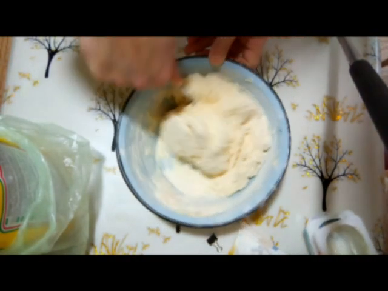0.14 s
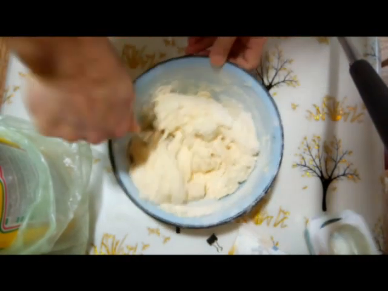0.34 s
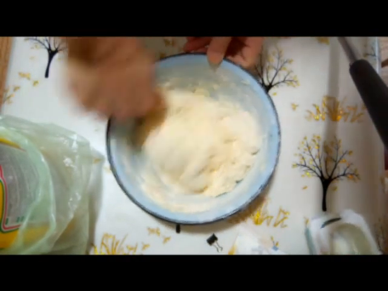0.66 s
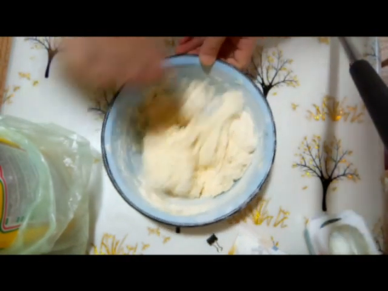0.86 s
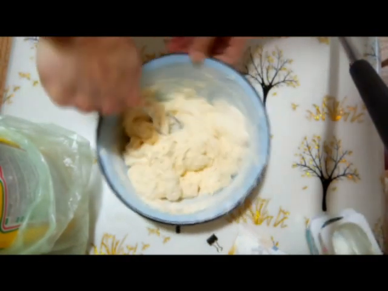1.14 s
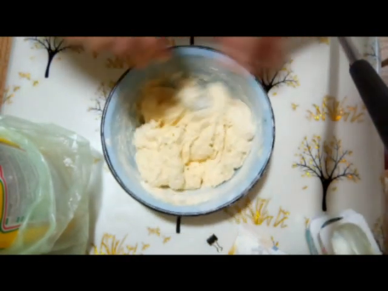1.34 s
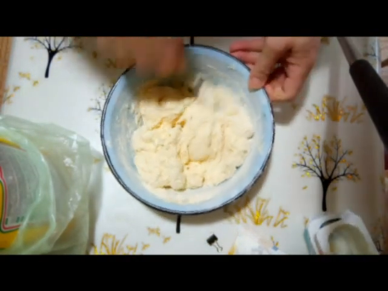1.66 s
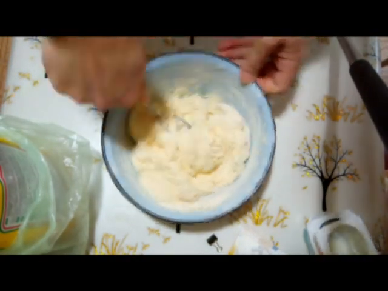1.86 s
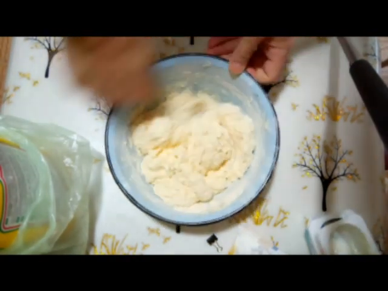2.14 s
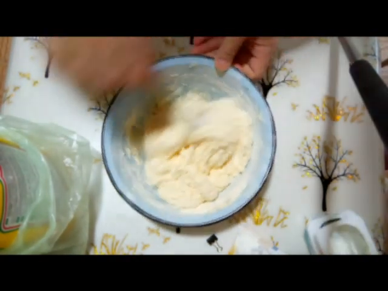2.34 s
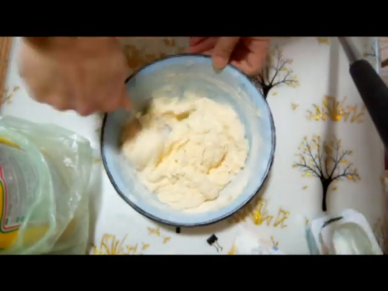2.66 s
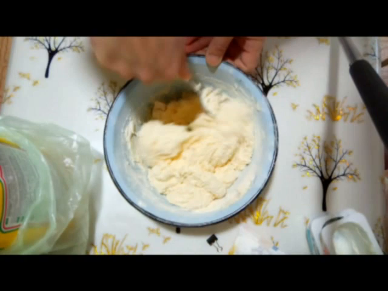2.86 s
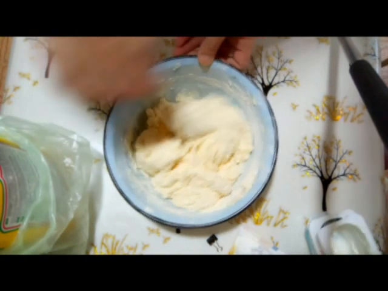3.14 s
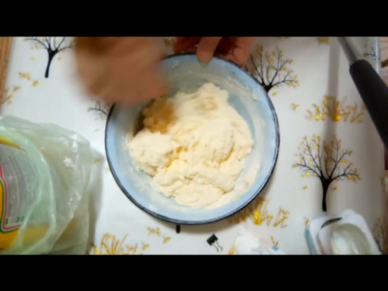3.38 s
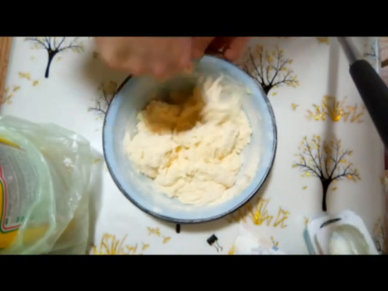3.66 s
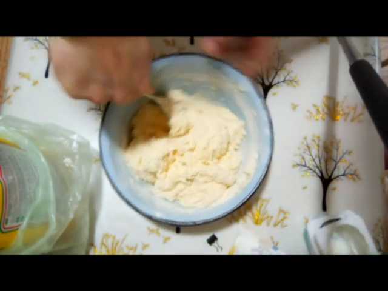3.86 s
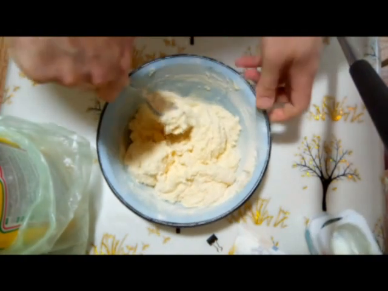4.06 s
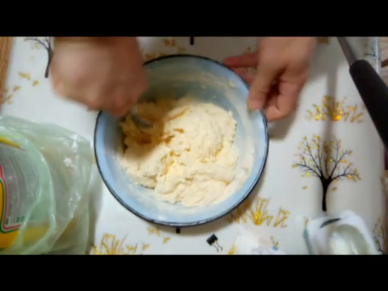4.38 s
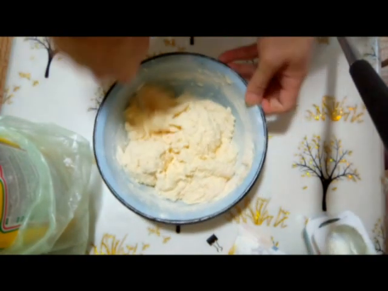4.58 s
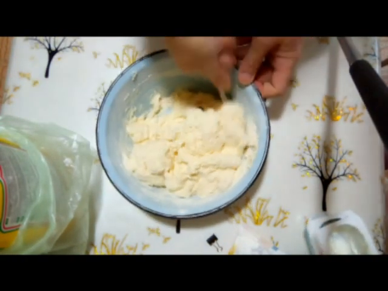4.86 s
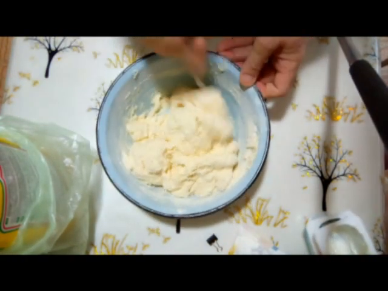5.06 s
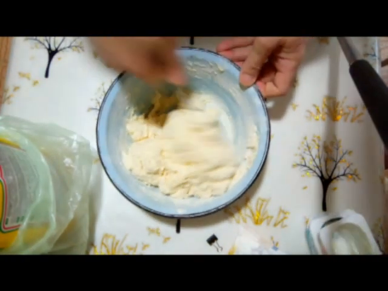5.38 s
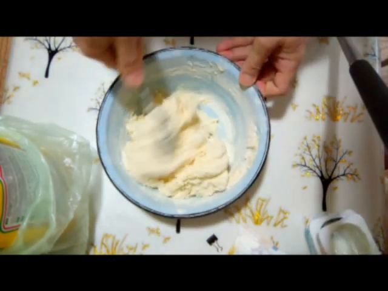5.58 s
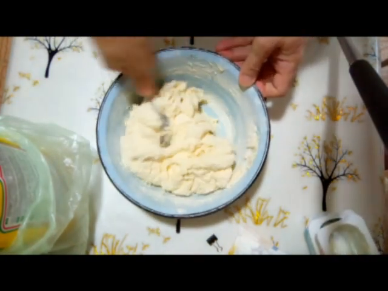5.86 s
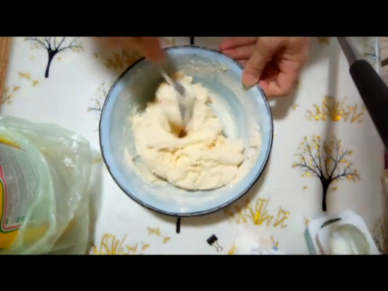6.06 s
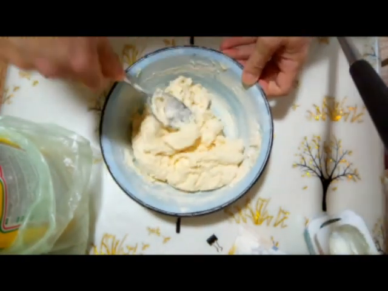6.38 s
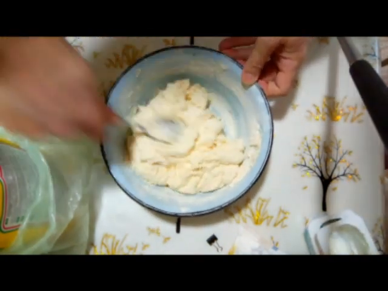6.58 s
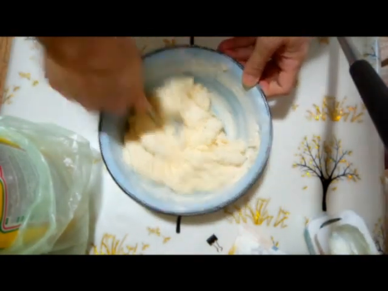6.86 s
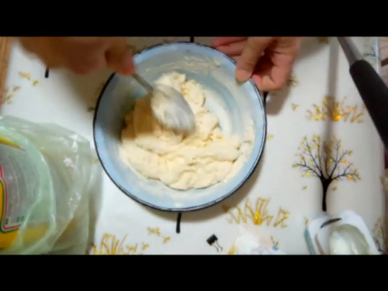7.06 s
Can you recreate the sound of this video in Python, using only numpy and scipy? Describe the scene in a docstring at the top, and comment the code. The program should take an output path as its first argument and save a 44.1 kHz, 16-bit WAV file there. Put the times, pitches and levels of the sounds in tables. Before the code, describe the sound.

A spoon stirs soft dough in an enamel bowl, with dull irregular knocks, short scrapes and the bowl bumping on a table.

```python
"""In the hush of a kitchen, soft dough squelches faintly and its enamel bowl rubs on the table. A spoon knocks
the bowl: the dough-laden wall rings briefly, the table thumps and the contact cracks, at times with a thin
bright flash. The spoon scrapes along the wall with a gritty hiss, rasp and hum. A clock ticks far off, the
bowl's foot bumps down with a deep boom, and small metal clinks midway."""
import sys
import numpy as np
from scipy import signal
from scipy.fft import rfft, irfft
from scipy.io import wavfile
from scipy.ndimage import uniform_filter1d

SR = 44100
rng = np.random.default_rng(int(sys.argv[2]) if len(sys.argv) > 2 else 0)


def unload_wav(signal):
    """Save mono or channel-first audio to the path in sys.argv[1] as 16-bit WAV at rate SR, clipped to [-1, 1]."""
    wavfile.write(
        sys.argv[1],
        SR,
        np.round(np.clip(np.atleast_2d(signal).T, -1, 1) * 32767).astype(np.int16),
    )


N = 318402


def gain_of(db):
    """Decibels to gain."""
    return 10 ** (np.asarray(db) / 20)


def unit_rms(x):
    """Scales to rms 1."""
    return x / np.sqrt(np.mean(x ** 2) + 1e-20)


def curve_at(points, hz):
    """Reads a curve on a log-frequency axis."""
    freq_hz, value = np.transpose(points)
    return np.interp(np.log(hz + 1), np.log(freq_hz + 1), value)


def add(mix, start_s, sound):
    """Mixes a sound in at a time."""
    part = mix[..., round(start_s * SR):][..., :sound.shape[-1]]
    part += sound[..., :part.shape[-1]]


def coloured(x, spectrum):
    """Gives noise a spectrum, rms 1."""
    n = x.shape[-1]
    return unit_rms(irfft(rfft(x) * gain_of(curve_at(spectrum, np.fft.rfftfreq(n, 1 / SR))), n))


def impulse(spectrum, size=4096):
    """The minimum-phase click of a spectrum: it starts at once."""
    log_gain = np.log(gain_of(curve_at(spectrum, abs(np.fft.fftfreq(size, 1 / SR)))))
    return np.fft.ifft(np.exp(np.conj(signal.hilbert(log_gain)))).real


def resonate(x, hz, *widths_hz):
    """Two-pole resonances in series, one for each width; rms 1."""
    for width in widths_hz:
        x = signal.lfilter(*signal.iirpeak(hz, hz / width, SR), x)
    return unit_rms(x)


def ring(modes, rise_s, spread_db=0., detune=0.):
    """One blow's dying modes, peak 1; spread and detune vary them from blow to blow."""
    t = np.arange(SR // 2) / SR
    hz, db, t60 = np.transpose(modes)[:, :, None]
    level_jitter, pitch_jitter = rng.standard_normal((2,) + db.shape)
    push = np.sin(np.pi / 2 * np.minimum(t / rise_s, 1)) ** 2  # the contact force builds smoothly
    decays = gain_of(db + spread_db * level_jitter - 60 * t / t60)
    sound = push * (decays * np.sin(2 * np.pi * hz * (1 + detune * pitch_jitter) * t)).sum(0)
    return sound / abs(sound).max()


def burst(noise, t60_s):
    """Shapes noise into a crack: sharp attack, fast decay."""
    t = np.arange(len(noise)) / SR
    return noise * np.minimum(t / .0004, 1) * gain_of(5 - 60 * t / t60_s)


def sparkle(hz):
    """A short, broad band of noise around a pitch."""
    return resonate(rng.standard_normal(4096), hz, .54 * hz, .54 * hz)


def friction(slips_per_s, spread_db, smooth):
    """Uneven micro-slips over a smooth rub."""
    sizes = gain_of(spread_db * np.minimum(rng.exponential(1, N), 5))
    slips = sizes * (rng.random(N) < slips_per_s / SR) * rng.choice([-1., 1.], N)
    return smooth * rng.standard_normal(N) + (1 - smooth) * unit_rms(slips)


def patchy(x, depth_db=6.5, bins=5, frames=8):
    """Sticky contact comes and goes in random blotches of frequency and time."""
    bands = signal.stft(x, nperseg=256, noverlap=192)[2]
    blotches = uniform_filter1d(rng.standard_normal(bands.shape), bins, 0)
    blotches = unit_rms(uniform_filter1d(blotches, frames, 1))
    bands *= gain_of(depth_db * blotches)
    return unit_rms(signal.istft(bands, nperseg=256, noverlap=192)[1][:len(x)])


# Room tone: freq_hz, level_db
HUSH_SPECTRUM = [(15, -46), (40, -16), (70, 2), (140, 0), (270, -4.5), (500, -9.5), (1150, -17),
                 (2500, -22.5), (5000, -26.5), (8000, -24.5), (12000, -18.5), (16000, -18.5)]

def hush():
    """A steady low bed of noise, unrelated left and right."""
    return gain_of(-61) * coloured(rng.standard_normal((2, N)), HUSH_SPECTRUM)


# Bright hiss of dough and spoon: freq_hz, level_db
HISS_SPECTRUM = [(2500, -26), (3800, -8), (5000, -5), (6500, -2), (9000, -2), (16000, -14.5)]

def dough():
    """The dough tears and squelches faintly all the while."""
    hiss = coloured(rng.standard_normal(N), HISS_SPECTRUM)
    return gain_of(-79) * patchy(hiss, depth_db=5, bins=16, frames=40)


# Deep modes of table and legs as a whole: pitch_hz, level_db, t60_s
BOOM_MODES = [(66, -9, .2), (116.5, -2.5, 0.22), (170, -4, 0.098)]
# Woody modes of the table top: pitch_hz, level_db, t60_s
TOP_MODES = [(212, -9, .12), (250, -8, .09), (281, 0, .13), (315, -4, .1), (345, -8, .09), (384, -6, .09),
             (425, -8, .09), (486, -1, .12), (570, -6, .09), (630, -6, .08), (721, -10, .1), (830, -9, .12)]
# Fader points for the sliding bowl: time_s, rumble_db, drone_db
SLIDE_LEVELS = [(0.0, -73, -76), (0.299, -62.5, -61), (0.95, -64, -81), (1.099, -61.5, -80),
                (1.6, -87, -87), (1.98, -61, -63), (2.12, -83.5, -85), (3.77, -77, -82), (3.81, -54, -55),
                (4.05, -66.5, -60.5), (4.119, -73, -53.5), (4.242, -80, -85), (4.971, -69, -74),
                (5.14, -69, -59), (5.4, -81, -89.5), (6.031, -69.5, -76), (6.44, -67.5, -86.5),
                (6.511, -54, -42), (6.6, -53, -55), (6.68, -47.5, -72), (6.70, -47, -49.5),
                (6.819, -46.5, -72), (6.879, -49, -74), (6.95, -63.5, -51.5), (7.09, -52, -67),
                (7.15, -51, -69), (7.22, -60, -67)]

def bowl_slide():
    """The foot's lumpy rubbing shakes the legs and the table top, the lower modes most."""
    rub = friction(slips_per_s=150, spread_db=1.5, smooth=.31)
    time_s, rumble_db, drone_db = np.transpose(SLIDE_LEVELS)
    out, t = np.zeros(N), np.arange(N) / SR
    for modes, db_per_octave, fader_db in (BOOM_MODES, -5, rumble_db), (TOP_MODES, -19, drone_db):
        shaken = sum(gain_of(db + db_per_octave * np.log2(hz / 115)) * resonate(rub, hz, 32, 90)
                     for hz, db, _ in modes)
        out += unit_rms(shaken) * gain_of(np.interp(t, time_s, fader_db))
    return out


# Modes of the dough-laden bowl around the struck pitch: pitch_ratio, level_db
BOWL_MODES = [(1, 5), (.6, -6), (.82, -7), (1.25, -11.5), (1.551, -14.5), (2.2, -19.5), (3.0, -30.5)]
# Hard tick of the contact: freq_hz, level_db
TICK_SPECTRUM = [(760, -30.5), (1300, -6), (2500, -4), (4200, -13), (6000, -12), (8000, -14.5),
                 (11000, -23.5), (16000, -43.5)]
# Spoon hits on the bowl; the row at 0.3015 s is the spoon catching briefly during a short scrape: start_s,
# ring_db, pitch_hz, t60_s, thump_db, tick_db
SPOON_HITS = [(0.1254, -9, 1134, 0.02, -51, -16.5), (0.3015, -37.5, 977, 0.029, -49.5, -42),
              (0.4901, -23.5, 280, 0.013, -37, -57.5), (0.4998, -5.5, 800, 0.0084, -15, -36.5),
              (0.8428, -30.5, 770, 0.02, -36.5, -42), (0.8931, -25, 817, 0.019, -53, -33),
              (0.933, -31.5, 233, 0.023, -60, -69), (0.9565, -33.5, 506, 0.0097, -45, -65),
              (1.018, -45.5, 590, 0.02, -57, -53.5), (1.124, -24, 381, 0.0081, -40.5, -77),
              (1.2700, -42, 860, 0.02, -40, -66), (1.389, -32, 940, .018, -65, -43),
              (1.5232, -26, 337, 0.016, -38, -63), (1.77, -48, 730, .018, -59, -57.5),
              (1.8168, -41, 1027, 0.01, -61.5, -53), (1.954, -7, 753, 0.014, -14.5, -35),
              (2.3380, -40.5, 393, 0.019, -35.5, -58), (2.8546, -17.5, 778, 0.023, -30, -53.5),
              (3.298, -48, 803, 0.023, -52.5, -46), (3.6223, -17.5, 500, 0.011, -21, -28),
              (3.6496, -13, 718, 0.033, -25, -71), (3.766, -26.5, 750, 0.016, -59.5, -54),
              (3.792, -34.5, 1220, 0.024, -44, -60), (5.0318, -51, 402.5, .018, -45.5, -59.5),
              (5.0473, -13, 769, 0.021, -39.5, -47.5), (6.4946, -23, 553, 0.0073, -36, -42),
              (6.5000, -36, 707, 0.016, -30.5, -38), (6.6305, -61.5, 1520, 0.014, -57, -48),
              (6.6934, -38, 260, .018, -54, -61), (6.7190, -31, 208, 0.027, -65, -75),
              (7.053, -43, 1060, 0.047, -46, -47.5)]

def spoon_knocks(thud_t60_s=.0087):
    """Bowl and table ring low; the contact is a clean click with a few milliseconds of grit behind it."""
    bowl, thud, wood, boom, crack = np.zeros((5, N))
    click = impulse(TICK_SPECTRUM)
    click /= abs(click).max()
    for start_s, ring_db, hz, t60_s, thump_db, tick_db in SPOON_HITS:
        rise_s = .99 / hz  # a blow builds over about one cycle: low knocks are softer
        # the thud is the blow's blunt start, most of what the walls send back
        for layer, decay_s in (bowl, t60_s), (thud, min(t60_s, thud_t60_s)):
            modes = [(hz * ratio, db, decay_s) for ratio, db in BOWL_MODES]
            add(layer, start_s, -gain_of(ring_db) * ring(modes, rise_s))
        add(wood, start_s, gain_of(thump_db) * ring(TOP_MODES, rise_s=.002, spread_db=2.5, detune=.01))
        add(boom, start_s, gain_of(thump_db - 22) * ring(BOOM_MODES, rise_s=.0033, spread_db=2))
        grit = coloured(rng.standard_normal(len(click)), TICK_SPECTRUM)
        grit += gain_of(-28.5) * sparkle(13000)
        add(crack, start_s, gain_of(tick_db) * (3 * click + .75 * burst(grit, t60_s=.0083)))
    return bowl, thud, wood, boom, crack


# Bright flashes of the spoon's contact: start_s, level_db, centre_hz, t60_s
CONTACT_FLASHES = [(0.127, -22.5, 13100, 0.0059), (1.018, -47.5, 6750, 0.018), (1.5107, -38, 7240, 0.0043),
                   (1.772, -44.5, 11500, 0.01), (3.6228, -27, 4900, 0.0023), (6.4936, -30, 10000, 0.0068),
                   (6.5, -24.5, 15100, 0.047), (6.5254, -36, 7500, .008), (6.6293, -31.5, 7060, 0.01),
                   (6.638, -33.5, 11900, 0.04), (7.0113, -35.5, 10870, 0.0051)]

def contact_flashes():
    """The spoon's contact flashes in thin, bright bursts."""
    out = np.zeros(N)
    for start_s, db, hz, t60_s in CONTACT_FLASHES:
        add(out, start_s, gain_of(db) * burst(sparkle(hz), max(t60_s, .003)))
    return out


# Resonances of the rubbed bowl wall: pitch_hz, width_hz, level_db
WALL_RESONANCES = [(760, 40, -8), (1040, 60, 0), (1150, 60, 5), (1230, 55, 4), (1310, 60, 1)]
# Midrange rasp of a scrape: freq_hz, level_db
RASP_SPECTRUM = [(900, -36), (1500, -1), (2000, 2.5), (3200, -6), (4500, -28), (8000, -45.5)]
# Strokes on the wall: start_s, rise_s, hold_s, fall_s, hiss_db, hum_over_hiss_db, rasp_over_hiss_db
SPOON_STROKES = [(0.296, .006, 0.0076, 0.014, -56, -2, 2), (0.359, .1, 0.018, 0.021, -56.5, -12.5, -21),
                 (0.831, 0.026, 0.034, 0.016, -46, 3.5, 4.5), (1.032, 0.063, 0.025, 0.042, -67, -10, -9),
                 (1.26, 0.009, 0.015, 0.043, -46.5, -18, -13),
                 (1.379, 0.023, 0.0078, 0.0093, -40, -5.5, -5.5),
                 (1.768, 0.056, 0.0028, 0.028, -55, -8, -10), (1.878, 0.039, 0.0025, 0.013, -52, -12, -8),
                 (2.066, 0.03, 0.011, 0.2, -58, -6.5, -4.5),
                 (2.277, 0.043, 0.0047, 0.055, -61.5, -8.5, -16),
                 (2.838, 0.044, 0.031, 0.068, -46.5, -1.5, -3), (2.983, 0.014, 0.11, 0.031, -67, -13, -9),
                 (3.609, .014, .002, .004, -48.5, 4.5, -10), (3.775, 0.024, 0.099, 0.032, -44.5, 3.5, -7.5),
                 (3.827, 0.083, 0.036, 0.099, -36.5, 8.5, -10.5),
                 (3.99, 0.049, 0.047, 0.032, -57.5, -0.5, -1), (4.923, 0.068, 0.014, 0.018, -65.5, -10, -4),
                 (5.096, 0.034, 0.015, 0.14, -55.5, -21, -0.5), (5.788, 0.027, 0.27, 0.027, -70.5, -10, -2),
                 (6.08, 0.0084, 0.003, 0.11, -57.5, -13.5, -14.5), (6.904, 0.1, 0.073, .02, -63, -36, -4),
                 (7.039, 0.058, 0.0045, 0.021, -44, -2.5, -10), (7.142, 0.17, 0.015, .02, -44.5, -22, -10)]

def spoon_scrapes(ends_db=-23.5):
    """The spoon's grit hisses and rasps in the air and hums in the wall; pressure rises, holds, falls."""
    rub = friction(slips_per_s=1800, spread_db=5.5, smooth=.65)
    hum = sum(gain_of(db) * resonate(rub, hz, width, 3 * width) for hz, width, db in WALL_RESONANCES)
    faders = np.zeros((3, N))
    for start_s, rise_s, hold_s, fall_s, hiss_db, hum_db, rasp_db in SPOON_STROKES:
        corners_s = np.cumsum([0, rise_s, hold_s, fall_s])
        t = np.arange(0, corners_s[-1], 1 / SR)
        pressure = gain_of(np.interp(t, corners_s, [ends_db, 0, 0, ends_db]))
        pressure *= signal.windows.tukey(len(t), .08)
        add(faders, start_s, pressure * gain_of(hiss_db + np.array([[0], [hum_db], [rasp_db]])))
    hiss_gain, hum_gain, rasp_gain = faders
    hiss = hiss_gain * patchy(coloured(rub, HISS_SPECTRUM))
    rasp = rasp_gain * patchy(coloured(rub, RASP_SPECTRUM))
    return hum_gain * unit_rms(hum), hiss + rasp


# Modes of the clock's tick: pitch_hz, level_db, t60_s
CLOCK_MODES = [(1532, -8, .025), (2060, -6, .025), (2525, -3, .025), (2784, -6, .02), (3670, -8, .015),
               (5400, -7, .012), (5900, -8, .012)]

def clock(tick_s=.302, tock_s=.808):
    """A slightly uneven tick-tock, one pair each second."""
    out = np.zeros(N)
    for second in range(N // SR):
        for offset_s in tick_s, tock_s:
            tick = ring(CLOCK_MODES, rise_s=.001047, spread_db=1, detune=.019)
            add(out, second + offset_s, gain_of(-49.5) * tick)
    return out


# Bumps of the bowl on the table: start_s, level_db, ring_time_ratio
FOOT_BUMPS = [(.5, -34, 1.1), (0.936, -36.5, .9), (1.124, -45.5, 0.94), (1.7701, -44.5, 1.15),
              (3.649, -34, 1.06), (6.4962, -20, 0.46)]

def bowl_bumps():
    """The bowl's foot comes down and the whole table booms."""
    out = np.zeros(N)
    for start_s, db, ring_time_ratio in FOOT_BUMPS:
        modes = np.multiply(BOOM_MODES, [1, 1, ring_time_ratio])
        add(out, start_s, gain_of(db) * ring(modes, rise_s=.005, spread_db=3))
    return out


# Modes of the small metal: pitch_hz, level_db, t60_s
METAL_MODES = [(3650, -18, .025), (4190, -1, .04), (4330, -8, .025), (4435, -2, .03), (4930, -9, .03),
               (4965, -4, .04), (5415, -11, .02), (5650, -9, .02), (6050, -8, .025), (6270, -11, .02),
               (6800, -20, .03), (7900, -14, .015)]
# Clinks: start_s, level_db, left_over_right_db, rise_s, tilt_db_per_octave
METAL_HITS = [(3.272, -49.5, -7.5, 0.031, -33), (3.2990, -32.5, -10, .004, 6),
              (3.3732, -72.5, -5.5, 0.0064, -8.5), (3.5349, -62, -14, .008, -16),
              (3.552, -49, -9.5, 0.0048, -18.5)]

def metal_clinks():
    """Small metal rings briefly, off to the right."""
    out = np.zeros((2, N))
    hz, mode_db, t60_s = np.transpose(METAL_MODES)
    octaves_up = np.log2(hz / hz[1]).clip(0)  # the tilt acts above the second mode
    for start_s, db, pan_db, rise_s, tilt in METAL_HITS:
        modes = np.transpose([hz, mode_db + tilt * octaves_up, t60_s])
        side_gains = gain_of(db + np.array([[.5], [-.5]]) * pan_db)
        add(out, start_s, side_gains * ring(modes, rise_s, spread_db=1.5, detune=.002))
    return out


# Reverb time of the kitchen: freq_hz, t60_s
KITCHEN_DECAY = [(100, 0.66), (260, 0.22), (700, 0.24), (1840, 0.24), (4850, 0.22), (8000, 0.24),
                 (12800, 0.05)]

def kitchen(send, alike_hz=900):
    """Sparse echoes of random sign, each band dying at its own speed; bass reaches both sides alike."""
    taps = np.zeros((3, SR // 2))
    grid = np.arange(120, SR // 2 - 20, 20)
    arrivals = grid + rng.integers(0, 20, (3, len(grid)))
    np.put_along_axis(taps, arrivals, rng.choice([-1., 1.], arrivals.shape), 1)
    hz, t, bands = signal.stft(taps, SR, nperseg=256)
    alike = .9 / (1 + (hz[:, None] / alike_hz) ** 2)
    bands = np.sqrt(alike) * bands[2] + np.sqrt(1 - alike) * bands[:2]
    decay = gain_of(-60 * t / curve_at(KITCHEN_DECAY, hz)[:, None])
    tail = signal.istft(bands * decay, SR, nperseg=256)[1]
    return signal.fftconvolve(send[None], tail / np.linalg.norm(tail[0]), axes=1)[:, :N]


def pan(x, lag_samples, left_db):
    """The right side hears the sound late; left_db is the left's level over the right's."""
    return np.array([x * gain_of(left_db / 2), np.roll(x, lag_samples) * gain_of(-left_db / 2)])


# The two microphone ports' housings favour different bands: freq_hz, left_over_right_db
PORT_BALANCE = [(20, 4), (150, .5), (1200, 0), (2200, -0.5), (4000, -2), (6200, -4), (7400, 11),
                (10000, 13), (12000, 6), (14500, -2), (16000, -2)]

def scene():
    """Bowl and table up close, nearly centred in the bass and wider in the treble, the room behind."""
    bowl, thud, wood, boom, crack = spoon_knocks()
    hum, scrape = spoon_scrapes()
    wood += bowl_slide()
    boom += bowl_bumps()
    crack += contact_flashes()
    hiss = scrape + dough()
    metal = metal_clinks()
    near = pan(bowl + wood + boom + hum, lag_samples=3, left_db=.3) + metal
    near += pan(crack, lag_samples=5, left_db=-4.5) + pan(hiss, lag_samples=12, left_db=-4.5)
    sends_db = [(bowl, -13), (thud, -5.5), (wood, -6), (hum, -15.5),
                (crack, -4), (hiss, -3.5), (boom, -10.5), (metal.mean(0), -8)]
    send = sum(gain_of(db) * layer for layer, db in sends_db)
    room = kitchen(send + clock())  # the far clock arrives only through the room
    housings = np.array([impulse(np.multiply(PORT_BALANCE, [1, half])) for half in (.5, -.5)])
    return signal.oaconvolve(near + room, housings, axes=1)[:, :N] + hush()


# Tone of the microphone: freq_hz, gain_db
MICROPHONE_EQ = [(20, -13), (45, -13.5), (80, -6), (4000, 1.5), (5300, 5), (6200, 3.5), (7200, -5.5),
                 (9000, -9.5), (12000, -17.5), (13700, -25.5), (14600, -5.5), (15200, -7.5), (16000, -14)]
CUTOFF_HZ = 15900

def record(dry):
    """The microphone's colour, then a steep high cut."""
    heard = signal.oaconvolve(dry, impulse(MICROPHONE_EQ)[None])[:, :N]
    high_cut = signal.firwin(511, CUTOFF_HZ, window=("kaiser", 9), fs=SR)
    return signal.oaconvolve(heard, high_cut[None], "same")


dry = scene()
out = record(dry)
unload_wav(out)
```